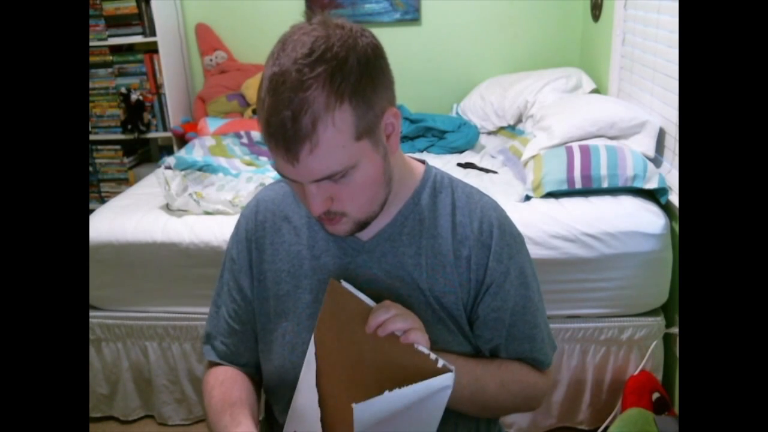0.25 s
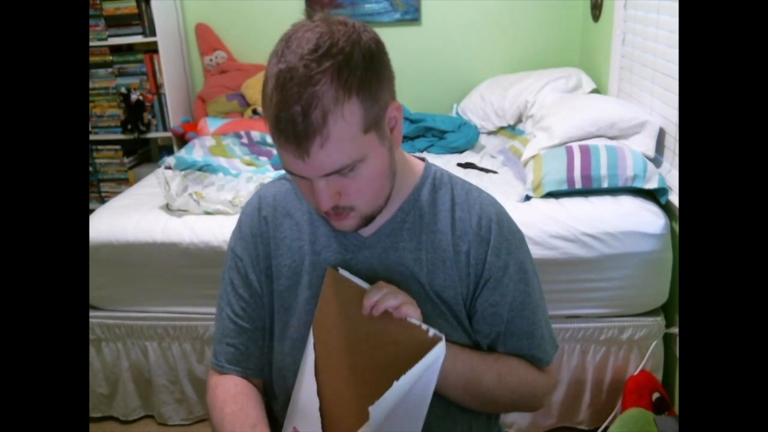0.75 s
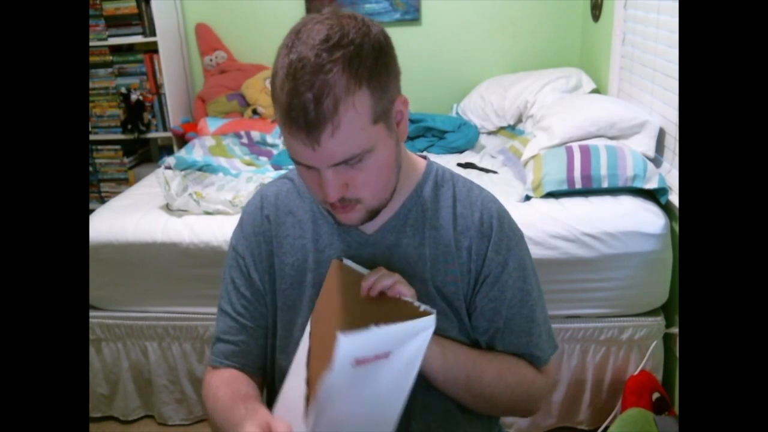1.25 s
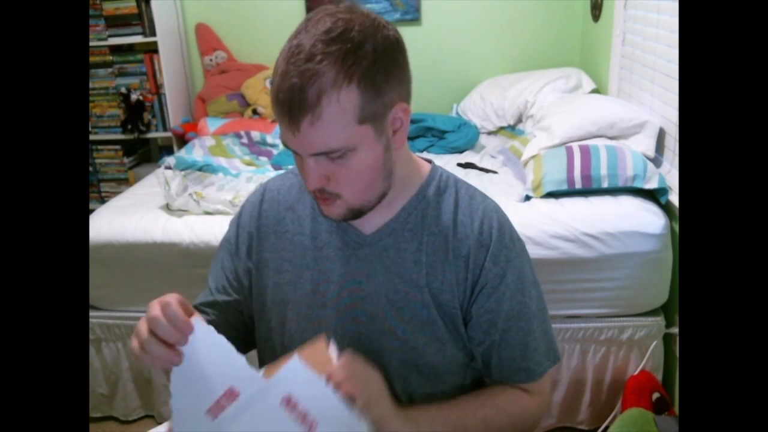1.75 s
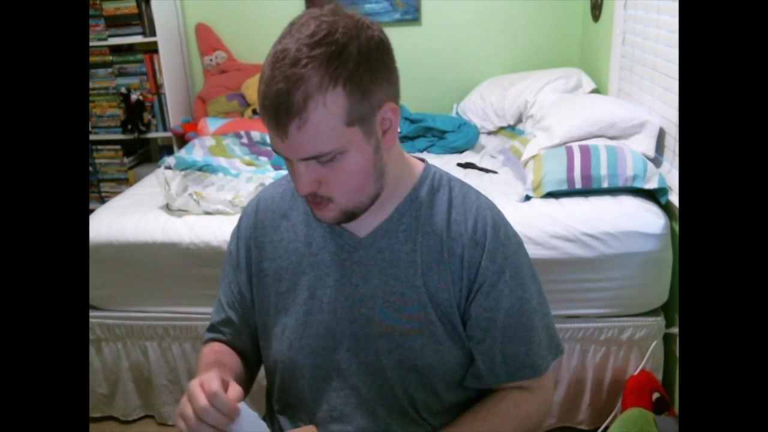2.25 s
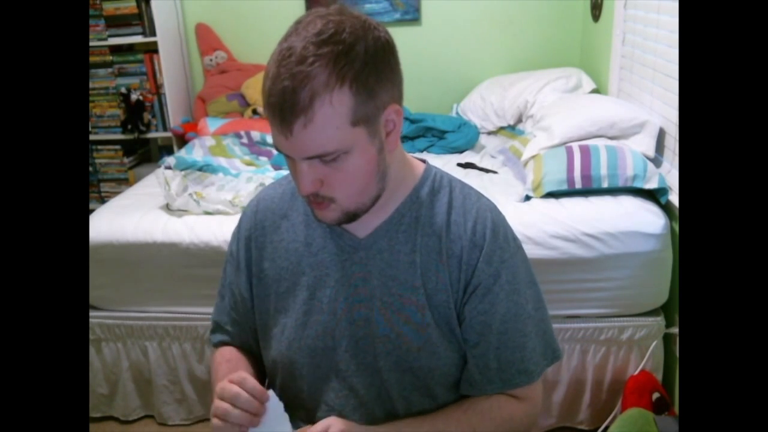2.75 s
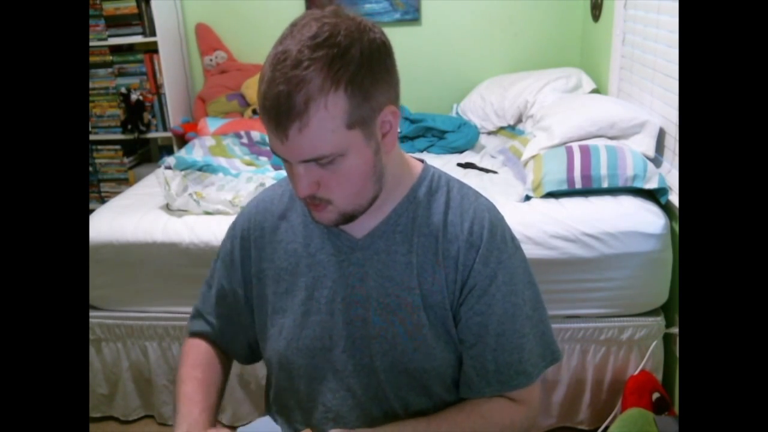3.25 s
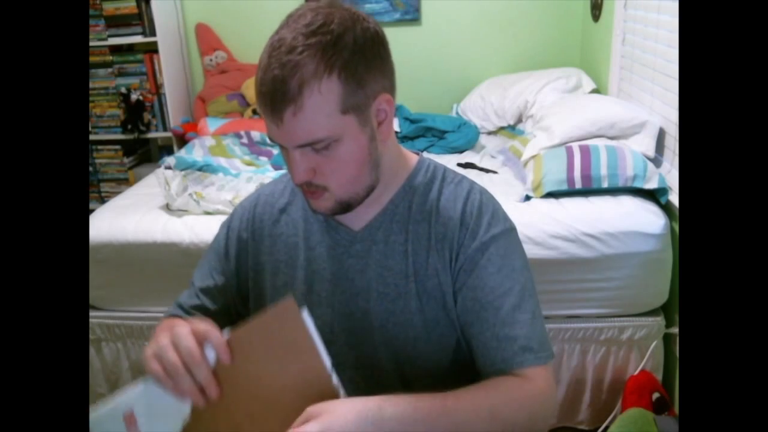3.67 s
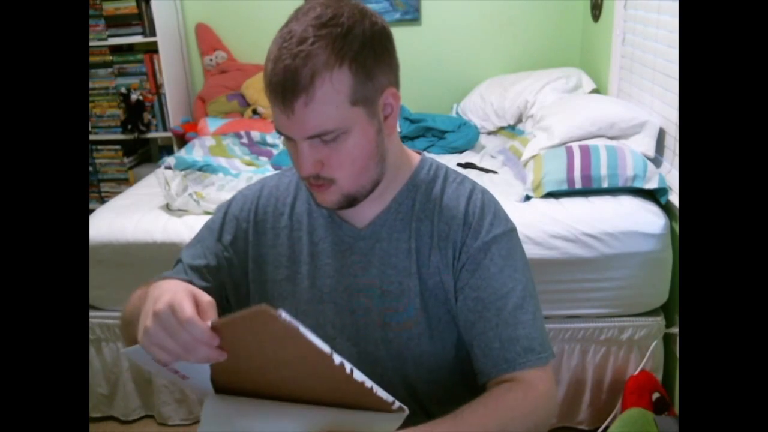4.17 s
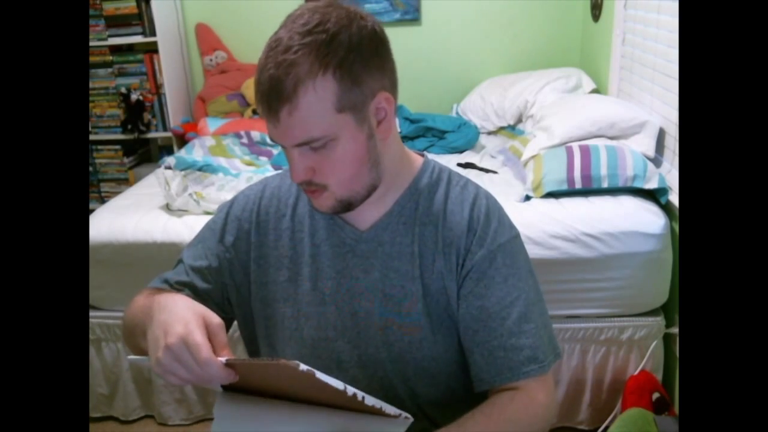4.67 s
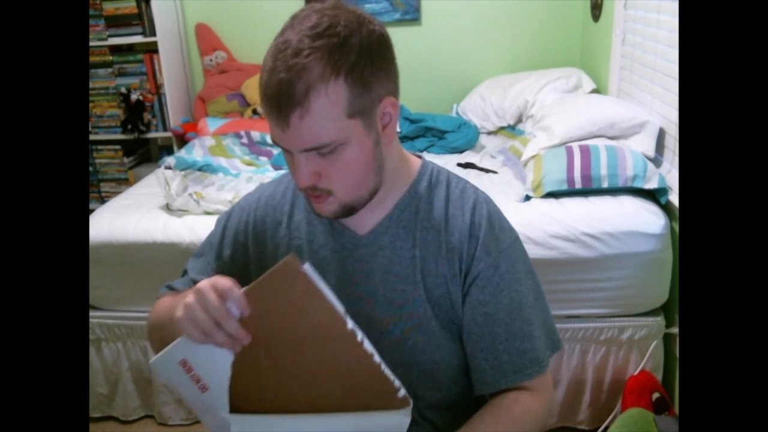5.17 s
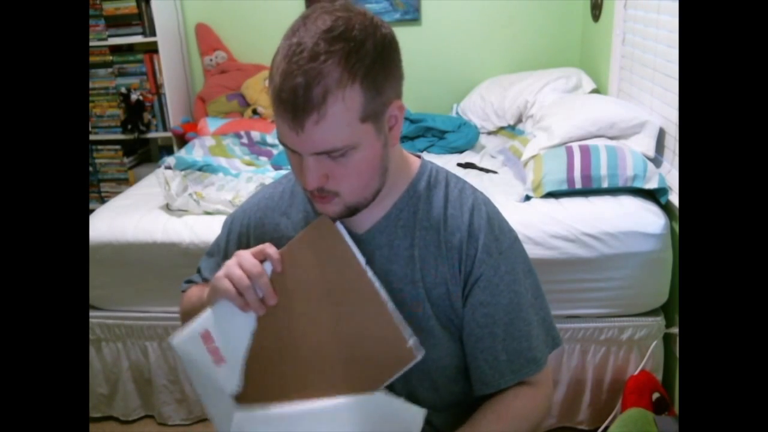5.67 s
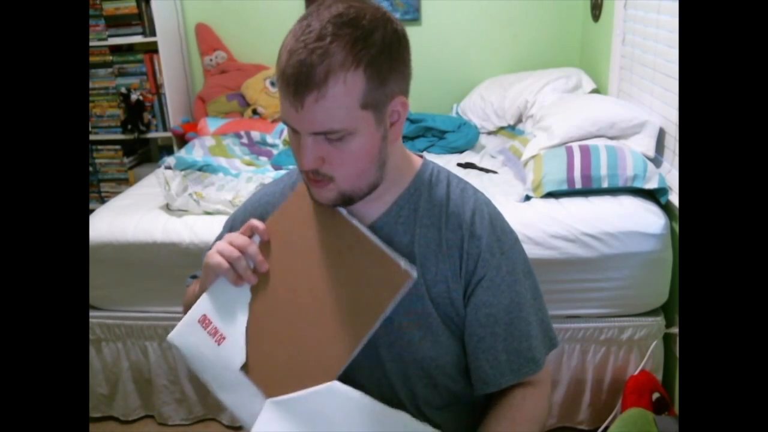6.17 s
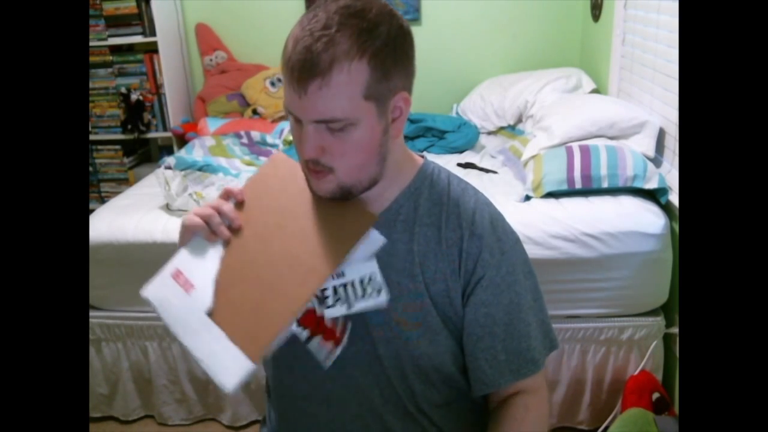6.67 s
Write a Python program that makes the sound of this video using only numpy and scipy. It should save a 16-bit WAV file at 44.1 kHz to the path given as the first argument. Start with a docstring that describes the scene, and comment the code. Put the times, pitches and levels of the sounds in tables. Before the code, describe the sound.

A small, quiet bedroom, heard close up, with a short dull echo and a steady low ventilation rumble underneath. At 0 s a stiff paper mailer is already ripping: a loud, bright, fibrous burst with dense snaps, strongest in the first 0.1 s, fading through small crackles until about 0.7 s. From 0.7 to 3.6 s there are only faint hissing brushes of hands on paper, with soft cardboard knocks around 1.4, 1.8, 2.0, 2.8 and a clearer one at 3.3 s. At about 3.7 s a brief rough swish crosses cloth with a blurred, rising then falling note. Light rustling continues; small creaks at 4.7 s, a firm knock at 5.0 s and a sharper crack at 5.1 s. From 5.3 to 6.7 s the card slips out in uneven rasping pulls, hollow and boomy, with thuds, snaps and ticks. A faint last knock and brush end it near 6.9 s.

```python
"""A paper mailer is ripped open by hand in a small, quiet bedroom: clumped fibre breaks ring the loose flap.
Thicker bundles snap, then a card insert sticks and slips out of the sleeve in several pulls.
The stiff packet knocks with a thud, crack and tick; hands brush over paper as a faint filtered hiss.
One swish over cloth adds a rough hiss and a gliding, blurred note.
Ventilation, made from steady filtered noise, rumbles low underneath."""
import sys
import numpy as np
from scipy import signal
from scipy.fft import rfft, irfft
from scipy.io import wavfile
from scipy.ndimage import uniform_filter1d

SR = 44100
rng = np.random.default_rng(int(sys.argv[2]) if len(sys.argv) > 2 else 0)


def generate_wav(signal):
    """Clip the signal to [-1, 1] and save it as 16-bit WAV at the path in sys.argv[1]."""
    frames = np.transpose(np.atleast_2d(signal))
    scaled = np.clip(frames, -1, 1) * 32767
    pcm = np.round(scaled).astype(np.int16)
    wavfile.write(sys.argv[1], SR, pcm)


N = 305613
TIME = np.arange(N) / SR

# All levels in the tables are relative: each layer sets its own final gain.
# spurts of the tear: (time [s], hold [s], release [s], level [dB],
#   panel share [dB], treble share [dB], ring pitch [Hz], ring share [dB])
RIP_SPURTS = [(0.0, .002, 0.03, -14.5, -13.5, -8, 2000, -3), (0.036, 0.031, 0.065, -27, -13, -2, 1050, 0),
              (0.091, .008, 0.19, -25.5, -14, -6, 1030, -12.5),
              (0.221, 0.011, .03, -36.5, -8, -0.5, 1850, 5),
              (0.278, 0.14, 0.083, -41, -11.5, -5.5, 1040, -17),
              (0.41, .11, .13, -37.5, -9.5, -6, 2050, -4), (0.654, .011, 0.1, -54, -21, 3, 2100, -4)]
# tone of torn paper: (frequency [Hz], density [dB per Hz])
RIP_COLOUR = [(110, -27), (210, -10), (310, -7.5), (430, -3.5), (680, -6.5), (1050, -8), (1700, -4.5),
              (2800, -8), (7000, -12), (10000, -15), (12500, -25.5), (14500, -45.5)]
# resonances of the loose flap: (frequency [Hz], width [Hz], lift [dB])
FLAP_MODES = [(300, 27, 3), (1080, 300, 1.5), (2800, 130, 2), (4190, 48, 1.5), (5230, 150, 1.8)]
# bundles of fibre and glue letting go:
#   (time [s], level [dB], crackle length [s], ring pitch [Hz], treble share [dB])
SNAPS = [(.001, -2, 0.0013, 1400, 3), (.0169, -0.5, .0014, 1200, 3.5), (0.019, -4, 0.0016, 2900, 2),
         (.0277, -24, .0006, 1300, 0), (.0588, -20.5, .0008, 6300, 12), (.068, -12, 0.00064, 3500, 3),
         (.0725, -20, 0.00079, 1760, 11), (0.0805, -15, .0006, 3700, 7), (0.092, 3, 0.001, 1070, -5.5),
         (0.124, -23.5, 0.00091, 1500, 5), (.135, -21, .0007, 7500, 0), (.293, -24.5, .0008, 2970, 8.5),
         (0.31, -29, 0.00089, 3700, 8), (.322, -24.5, 0.00083, 3450, 7), (.3715, -23, 0.0012, 2190, 8),
         (.408, -26, .00065, 3520, 10.5), (.44, -24, 0.00055, 3500, -4), (0.478, -24, .0015, 1700, 8),
         (.496, -20, 0.0016, 2130, 5), (.6548, -34, 0.00067, 2280, 10), (5.170, -23.5, .0028, 480, 4),
         (5.3375, -28, 0.00053, 1600, -7), (5.397, -22, .0009, 520, 5), (5.455, -19, 0.00058, 680, 2),
         (5.6118, -25, 0.002, 410, 10), (5.6522, -18, .0007, 413, 3), (5.7163, -12, 0.00074, 1100, 4),
         (5.7238, -15, 0.00094, 560, -2.5), (5.8262, -24, .001, 1500, 5), (5.979, -18.5, 0.0042, 2230, 5.5),
         (6.022, -23, 0.0043, 2250, 5.5), (6.045, -31, 0.0011, 2200, 4), (6.136, -27, .0008, 420, 9),
         (6.148, -29, .0006, 1625, 7), (6.169, -25, .0008, 1670, 8), (6.2633, -18, 0.0013, 1240, 6),
         (6.2747, -19.5, 0.001, 4950, 6.5), (6.281, -18, 0.0012, 2260, 6.5), (6.312, -28, 0.0013, 2480, 6),
         (6.431, -30, 0.00091, 1030, 12), (6.531, -20, 0.0012, 1020, 8.5), (6.611, -15, 0.0016, 3880, 6.5)]
# pulls on the card, which slips, is gripped again and slips on: (time [s], hold [s], release [s],
#   level [dB], panel share [dB], treble share [dB], ring pitch [Hz], ring share [dB])
TUGS = [(5.126, .023, .07, -47.5, -16, -12, 2660, 10), (5.169, 0.0064, 0.027, -43.5, -1, -1, 2600, -6),
        (5.343, 0.014, 0.064, -44, -8, -8, 1500, -6), (5.397, 0.0062, .15, -31, -5.5, -7.5, 720, -16),
        (5.449, 0.028, 0.033, -27.5, -4.5, -10, 746, 1), (5.626, 0.029, .12, -30, -1.5, -8.5, 1010, -12),
        (5.686, .07, 0.065, -26.5, -8.5, -4.5, 1100, -8), (5.767, 0.065, .14, -29.5, -3.5, -7.5, 1930, -5),
        (5.981, 0.0091, 0.05, -39, -1, 1.5, 2130, 0), (6.02, 0.021, 0.053, -36, -3.5, -4.5, 1620, 7),
        (6.09, 0.004, 0.025, -39.5, 5.5, 3, 2090, 8), (6.137, .046, 0.08, -41.5, -1, -6.5, 1630, 9),
        (6.199, .047, 0.12, -30.5, -5.5, -7.5, 1650, -23), (6.251, 0.068, 0.07, -28, -10, -10, 3100, -5),
        (6.4, 0.098, .08, -44, -1.5, -2, 980, 7.5), (6.46, 0.013, 0.1, -34, -5, -6.5, 1020, -5),
        (6.512, 0.12, 0.061, -35, -10, -8.5, 1020, -15), (6.6, 0.017, .085, -28.5, -8.5, -18, 4260, 4),
        (6.721, 0.0087, 0.026, -30.5, -12.5, -30, 2550, -9)]
# tone of card against sleeve: (frequency [Hz], density [dB per Hz])
PULL_COLOUR = [(120, -9), (210, -17.5), (310, -3.5), (400, -3), (510, -2.7), (800, -11), (1200, -11),
               (1700, -9.5), (2500, -10), (5000, -7.5), (7500, -10.5), (10500, -13.5), (12500, -22.5),
               (15000, -36)]
# resonances of the packet's panels: (frequency [Hz], width [Hz], lift [dB])
PANEL_MODES = [(522, 45, 5), (1016, 100, 3), (1670, 100, 2.5), (3550, 160, -2.5)]
# the stiff packet buckling or being knocked: (time [s], panel pitch [Hz], crease pitch [Hz],
#   thud level [dB], crack level [dB], tick level [dB], contact length [s])
KNOCKS = [(1.384, 337, 1500, -47, -47, -72, 0.0055), (1.3892, 417, 2000, -47, -45.5, -67, 0.0021),
          (1.399, 400, 1910, -55, -48, -74, 0.0023), (1.4177, 525, 2250, -55, -43.5, -61, 0.0026),
          (1.760, 403, 1400, -58, -53, -66, .005), (1.834, 480, 1930, -54, -46.5, -60, 0.0043),
          (2.024, 380, 1300, -59, -72, -80, 0.00097), (2.0305, 387, 2140, -46, -51.5, -87, .0016),
          (2.202, 398, 1480, -64, -61, -74, 0.00092), (2.795, 344, 1470, -54.5, -50, -81.5, 0.002),
          (2.878, 520, 1610, -53, -58.5, -74, .003), (2.895, 535, 1110, -53, -55, -77.5, 0.0028),
          (3.3055, 494, 2390, -41.5, -47.5, -64, 0.001), (3.315, 537, 2500, -52, -54, -66, 0.0012),
          (4.709, 500, 1564, -60, -52, -61, 0.0061), (4.758, 597, 1000, -58, -48, -60, 0.012),
          (4.872, 496, 1000, -56, -50, -67, 0.0086), (4.9954, 720, 1530, -41, -39, -82, 0.00021),
          (4.9982, 696, 1580, -30.5, -34.5, -67, 0.00058), (5.1162, 547, 1390, -31, -28, -40.5, 0.00074),
          (5.395, 550, 950, -35.5, -37.5, -36.5, 0.0038), (5.4789, 540, 800, -35, -32, -44, 0.0023),
          (5.629, 433, 1000, -32, -45, -37, 0.0032), (5.683, 494, 1100, -32, -47, -48, 0.0015),
          (5.7157, 525, 1110, -30, -40, -44, .002), (5.761, 495, 1510, -33, -31, -44, 0.0014),
          (5.824, 500, 1050, -33.5, -36, -48, 0.00062), (6.0265, 480, 1500, -36.5, -40.5, -35.5, 0.00054),
          (6.0906, 477, 1640, -35, -36.5, -56, 0.0033), (6.2008, 462, 1550, -31, -35, -59, 0.0012),
          (6.242, 425, 1000, -38, -34.5, -50, 0.00093), (6.647, 440, 1600, -39.5, -36.5, -63, 0.0036),
          (6.717, 600, 1270, -44, -35, -57, 0.0077), (6.867, 640, 1580, -45.5, -45, -67, 0.0094)]
# tone of a knock's thud: (multiple of the panel pitch [ratio], density [dB per Hz])
THUD_COLOUR = [(.24, -8.5), (.48, -7.5), (.68, 8), (1.2, 11.5), (1.65, -6), (2.8, -17.5), (5.5, -41),
               (20, -85)]
# tone of a crease cracking: (frequency [Hz], density [dB per Hz])
CRACK_COLOUR = [(350, -16), (700, 2.5), (930, 7.5), (1170, 3), (1550, 1), (1900, -1), (2400, -6.5),
                (3200, -15), (5000, -30), (12000, -85)]
# tone of an edge ticking: (frequency [Hz], density [dB per Hz])
TICK_COLOUR = [(1500, -24), (3000, 5), (6500, 6.5), (10000, -3.5), (13000, -14), (15500, -27)]
# light slides of hands and card over paper: (time [s], hold [s], level [dB], fine hiss share [dB])
BRUSHES = [(0.737, 0.28, -60.5, -8.5), (1.068, 0.031, -56, -7), (1.199, 0.061, -70.5, 1.5),
           (1.416, .02, -59, -24), (1.486, 0.22, -62.5, -5.5), (1.757, .02, -57.5, -5.5),
           (1.82, 0.17, -74, -3), (2.088, 0.036, -64.5, -6.5), (2.25, 0.026, -61, -13.5),
           (2.442, 0.0088, -60, -13), (2.649, 0.046, -57, -9.5), (2.798, .11, -68, -7),
           (3.302, 0.026, -63, -7), (3.432, 0.2, -65, -6.5), (3.695, 0.1, -57, -20),
           (3.822, 0.069, -64.5, -8.5), (4.004, .03, -73.5, -4.5), (4.71, 0.081, -60, -15),
           (4.881, 0.024, -58.5, -14), (5.022, 0.027, -63, -13), (5.237, 0.087, -61, -9.5),
           (6.79, 0.15, -57, -6.5)]
# tone of a light slide: (frequency [Hz], density [dB per Hz])
BRUSH_COLOUR = [(200, -3), (400, 3), (1000, -1), (1800, -1), (3500, -4), (5200, -4), (7500, -5.5),
                (10500, -7.5), (12500, -13.5), (14500, -37)]
# tone of the packet scraping over cloth: (frequency [Hz], density [dB per Hz])
SWISH_COLOUR = [(1500, -26), (2800, -6), (3500, -8), (5100, 1.5), (6300, -6.5), (9500, -7), (12000, -15),
                (14000, -43)]
# glide of the note from the weave: (time [s], pitch [Hz])
SWISH_PITCH = [(3.655, 2800), (3.70, 4300), (3.745, 4840), (3.81, 3880)]
# tone of ventilation and still air: (frequency [Hz], density [dB per Hz])
AIR_COLOUR = [(12, 1), (22, 6), (36, -4), (52, 0.5), (78, -5), (115, -15), (165, -27), (210, -30.5),
              (330, -29), (570, -30.5), (950, -39.5), (2300, -48), (5000, -56), (6500, -61), (15500, -68)]

# an attack is the time a stroke takes to swell by its last 20 dB
RIP_ATTACK_S, TUG_ATTACK_S = 0.0043, 0.028
BRUSH_ATTACK_S, BRUSH_RELEASE_S = 0.085, 0.083
SNAP_WIDTH_HZ, SNAP_LIFT_DB = 250, 13.5   # each snap rings its own patch of paper
RING_WIDTH_HZ = 200   # of the stretch of paper that a stroke pulls taut
KNOCK_SPAN_S = 0.012   # each part of a dry knock has its level as rms over this time
CREASE_WIDTH_HZ, CREASE_LIFT_DB = 380, 6
SETTLE_S, SETTLE_DB = 0.026, -11   # after a knock the sheets touch again a few times
CATCHES_PER_S, CATCH_DB, CATCH_SPREAD_DB = 22, -22, 6   # stray fibres catch while the paper slides
SWISH_AT_S, SWISH_HOLD_S, SWISH_ATTACK_S, SWISH_RELEASE_S = 3.69, 0.067, 0.075, 0.1
SWISH_DB = -53.5
WEAVE_DB, WEAVE_WIDTH_HZ = -6.5, 1600   # level relative to the swish
AIR_DB = -39
ROOM_FADE_S, ROOM_DULL_HZ = 0.28, 9040   # 60 dB fall before the tail is tapered; treble edge
ROOM_DB, KNOCK_ROOM_DB = -3.5, -4.5   # echo relative to direct sound, before dulling
CUTOFF_HZ = 15800


def rip():
    """Fibres break in clumps as the tear runs and set the loose flap ringing."""
    gain, panel_db, treble_db, *_ = strokes(RIP_SPURTS, RIP_ATTACK_S)
    jerk = jerks(per_s=300, decay_s=.0006, depth_db=2.5, spread_db=2.5)
    breaks = grains(per_s=2200, spread_db=1.5, ring_s=0.00054, smooth_db=-5.5, patchy_db=1.0, jerk=jerk)
    drive = breaks * gain + taut(breaks, RIP_SPURTS, RIP_ATTACK_S)
    flap = through(drive, response(RIP_COLOUR, FLAP_MODES))
    return from_db(-4.0) * shade(flap, panel_db + 11.0, treble_db + 4)


def snaps():
    """Thicker bundles part with a bright crack and a brief ring."""
    out = np.zeros(N)
    for s, level_db, crackle_s, ring_hz, treble_db in SNAPS:
        patch = response(RIP_COLOUR, [(ring_hz, SNAP_WIDTH_HZ, SNAP_LIFT_DB)])
        crack = from_db(level_db + 4.5) * through(blow(crackle_s), patch)
        body = signal.lfilter(*signal.butter(1, 2700, fs=SR), crack)
        add(out, s, body + (crack - body) * from_db(treble_db))
    return shade(out, panel_db=-7.5, treble_db=3.0)


def pull():
    """Card sticks and slips against the sleeve, whose panels boom under the rasp."""
    gain, panel_db, treble_db, *_ = strokes(TUGS, TUG_ATTACK_S)
    jerk = jerks(per_s=170, decay_s=0.00087, depth_db=2.0, spread_db=2.5)
    slips = grains(per_s=4500, spread_db=3.0, ring_s=0.00076, smooth_db=-4.0, patchy_db=2.5, jerk=jerk)
    drive = slips * gain + taut(slips, TUGS, TUG_ATTACK_S)
    rasp = through(drive, response(PULL_COLOUR, PANEL_MODES))
    return from_db(-1.58) * shade(rasp, panel_db + 5.5, treble_db + 1.5)


def knocks():
    """Each knock thuds in the panel, cracks in a crease and ticks at the edge."""
    out, tick = np.zeros(N), response(TICK_COLOUR)
    for s, pitch_hz, crease_hz, thud_db, crack_db, tick_db, contact_s in KNOCKS:
        # the panel gives as a whole; its free span sets the pitch
        thud = response(np.array(THUD_COLOUR) * [pitch_hz, 1], [(pitch_hz, 260, 5)])
        add(out, s, from_db(thud_db) * thud)
        crumple = through(blow(contact_s), settle())
        crack = response(CRACK_COLOUR, [(crease_hz, CREASE_WIDTH_HZ, CREASE_LIFT_DB)])
        for level_db, ring in ((crack_db, crack), (tick_db, tick)):
            sound = through(crumple, ring)
            add(out, s, from_db(level_db) * sound / np.linalg.norm(sound))
    return out * np.sqrt(KNOCK_SPAN_S * SR)


def brush():
    """Light sliding contact: a fine, faint hiss with sparse catching fibres."""
    rows = [(s, hold_s, BRUSH_RELEASE_S, db, fine) for s, hold_s, db, fine in BRUSHES]
    touch, fine_db = strokes(rows, BRUSH_ATTACK_S)
    uneven_hiss = rms_one(rng.standard_normal(N) * from_db(1.9 * drift(260)))
    rubbing = uneven_hiss + from_db(CATCH_DB) * catches()
    hiss = through(rubbing * touch, response(BRUSH_COLOUR))
    coarse = lows(hiss, 4800)
    return from_db(0.5) * (coarse + (hiss - coarse) * from_db(fine_db + 6.5))


def swish():
    """The packet scrapes over cloth: a rough hiss, and threads ticking past as a blurred gliding note."""
    lift = from_db(SWISH_DB) * stroke(SWISH_AT_S, SWISH_HOLD_S, SWISH_ATTACK_S, SWISH_RELEASE_S)
    roughness = jerks(per_s=240, decay_s=.002, depth_db=-1, spread_db=1.5)
    scrape = through(rng.standard_normal(N) * roughness, response(SWISH_COLOUR))
    pitch_hz = np.interp(TIME, *np.transpose(SWISH_PITCH))
    phase = 2 * np.pi * np.cumsum(pitch_hz) / SR
    # low noise times a tone blurs the note into a band
    threads = rms_one(lows(rng.standard_normal(N), WEAVE_WIDTH_HZ / 2) * np.cos(phase))
    drag = from_db(SWISH_DB + WEAVE_DB) * stroke(3.662, hold_s=.105, attack_s=0.022, release_s=0.06)
    return lift * scrape + drag * threads


def air():
    """Steady low rumble of ventilation with a faint duct tone."""
    ring = response(AIR_COLOUR, [(556, 30, 3.0)])
    noise = rng.standard_normal(N + len(ring) - 1)
    return from_db(AIR_DB) * rms_one(signal.fftconvolve(noise, ring, "valid"))


def bedroom(x, wet_db, count=3, size=20000):
    """Direct sound, then a short dull tail whose echo pattern shifts as the packet moves."""
    t = TIME[:size]
    fade = from_db(-60 * t / ROOM_FADE_S) * np.clip((t - .0015) / 0.0011, 0, 1)
    places = np.array([drift(7) for _ in range(count)])
    places /= np.linalg.norm(places, axis=0)
    echoes = sum(through(x * place, diffuse(fade)) for place in places)
    echoes = signal.lfilter(*signal.butter(1, ROOM_DULL_HZ, fs=SR), echoes)
    wet = from_db(wet_db)
    return (x + wet * echoes) / np.sqrt(1 + wet ** 2)


def diffuse(fade, size=61):
    """Scattered echoes that favour no broad band of pitch; unit energy."""
    echoes = rng.standard_normal(len(fade)) * fade
    spectrum = rfft(echoes)
    band_power = uniform_filter1d(np.abs(spectrum) ** 2, size=size)
    echoes = irfft(spectrum / np.sqrt(band_power), len(fade))
    echoes *= (fade > 0) * np.linspace(1, 0, len(fade)) ** 2   # taper to silence
    return echoes / np.linalg.norm(echoes)


def grains(per_s, spread_db, ring_s, smooth_db, patchy_db, jerk):
    """Ringing slips over a rubbing hiss, driven in jerks, with a wandering colour; rms 1."""
    hiss = rng.standard_normal(N)
    bass = lows(hiss, 740)   # the large panels average over many slips
    slips = rms_one(pings(per_s, spread_db, ring_s) + from_db(smooth_db) * (hiss - bass))
    crackle = 0
    for edge_hz in 1200 * 1.3 ** np.arange(11):
        band = lows(slips, edge_hz)
        slips = slips - band
        # each spot of paper favours other bands
        crackle = crackle + band * rms_one(from_db(patchy_db * drift(35)))
    return rms_one(even(bass) + even(crackle * jerk))


def pings(per_s, spread_db, ring_s, size=160):
    """Each tiny slip rings a facet of paper for a moment, at a pitch of its own; rms 1."""
    when, pitch, strength, phase = rng.random((int(per_s * N / SR), 4)).T[:, :, None]
    hz = 700 + 13000 * pitch
    height = from_db(spread_db * np.minimum(-np.log1p(-strength), 3))
    t = TIME[:size]
    rings = height * np.sin(2 * np.pi * (hz * t + phase)) * np.exp(-t / ring_s)
    at = (when * N).astype(int) + np.arange(size)
    return rms_one(np.bincount(at.ravel(), rings.ravel(), minlength=N)[:N])


def jerks(per_s, decay_s, depth_db, spread_db):
    """Stick and slip: a gain that jumps each time the paper lets go, mostly a little, then sinks; rms 1."""
    lets_go = rng.random(N) < per_s / SR
    jump_db = depth_db + spread_db * np.minimum(rng.exponential(1, N), 3)
    releases = lets_go * from_db(jump_db) ** 2
    surge = signal.lfilter([1], [1, -np.exp(-1 / (decay_s * SR))], releases)
    return rms_one(np.sqrt(1 + surge))


def taut(x, rows, attack_s):
    """Each stroke pulls another stretch of paper taut, which rings at its own pitch."""
    out, r = np.zeros(N), np.exp(-np.pi * RING_WIDTH_HZ / SR)
    for s, hold_s, release_s, db, _, _, ring_hz, ring_db in rows:
        drive = x * from_db(db + ring_db) * stroke(s, hold_s, attack_s, release_s)
        resonator = [1, -2 * r * np.cos(2 * np.pi * ring_hz / SR), r * r]
        out += signal.lfilter([1 - r, 0, r - 1], resonator, drive)
    return out


def blow(contact_s, size=4096):
    """A short contact is one sharp give; a long one crumples in a swelling flurry. Unit energy."""
    age = TIME[:size] / contact_s
    flurry = rng.standard_normal(size) * np.sqrt(age) * np.exp(-age)
    push = (contact_s / 0.00069) * flurry / np.linalg.norm(flurry)
    push[0] += 1
    return push / np.linalg.norm(push)


def settle(count=4, size=2048):
    """A first contact, then a few weaker ones at uneven times."""
    touches = np.zeros(size)
    touches[0] = 1
    for when, strength in rng.random((count, 2)):
        at = min(int((.1 + when) * SETTLE_S * SR), size - 1)
        touches[at] += from_db(SETTLE_DB) * strength * (1.5 - when)
    return touches


def catches():
    """Sparse clicks of uneven size, as stray fibres catch; rms 1."""
    strength_db = CATCH_SPREAD_DB * np.minimum(rng.exponential(1, N), 3)
    return rms_one((rng.random(N) < CATCHES_PER_S / SR) * from_db(strength_db))


def stroke(s, hold_s, attack_s, release_s):
    """Gain of one hand movement: swells up to time s, holds, dies away; 20 dB per attack or release time."""
    early = np.maximum(s - TIME, 0) / attack_s
    late = np.maximum(TIME - s - hold_s, 0) / release_s
    return np.exp(-np.log(10) * np.minimum(early + late, 6))   # floor at -120 dB


def strokes(rows, attack_s):
    """Joint gain of rows (s, hold, release, level, tones..), then each tone, weighted by stroke power."""
    gains = [from_db(db) * stroke(s, hold_s, attack_s, release_s) for s, hold_s, release_s, db, *_ in rows]
    power = np.array(gains) ** 2
    total = power.sum(axis=0)
    tones = np.transpose([row[4:] for row in rows])
    return [np.sqrt(total), *tones @ power / total]


def shade(x, panel_db, treble_db):
    """The grip changes how much the panels boom and how bright the edge sounds."""
    boom, body = lows(x, 746), lows(x, 2700)
    return boom * from_db(panel_db) + body - boom + (x - body) * from_db(treble_db)


def even(x, size=1300):
    """The hand pulls steadily: only flutter faster than about 30 ms is left."""
    return x * np.std(x) / np.sqrt(uniform_filter1d(x ** 2, size=size) + 1e-12)


def response(colour, modes=(), size=8192):
    """Causal unit-energy ring of a body with this spectrum and these resonances."""
    hz = np.maximum(np.arange(size // 2 + 1) * SR / size, 1)
    points = np.array(colour)
    db = np.interp(np.log(hz), np.log(points[:, 0]), points[:, 1])
    db = db + 40 * np.log10(np.minimum(hz / points[0, 0], 1))   # 12 dB per octave below the first point
    for centre, width, lift_db in modes:
        db = db + lift_db / (1 + (2 * (hz - centre) / width) ** 2)
    # fold the cepstrum: minimum phase, so the ring starts at once
    cepstrum = irfft(np.log(from_db(db)))
    cepstrum[1:size // 2] *= 2
    cepstrum[size // 2 + 1:] = 0
    ring = irfft(np.exp(rfft(cepstrum)))
    return ring / np.linalg.norm(ring)


def through(x, ring):
    """Drive a body or a room with x."""
    return signal.oaconvolve(x, ring)[:N]


def lows(x, edge_hz):
    """The part of x below an edge, without delay."""
    return signal.sosfiltfilt(signal.butter(2, edge_hz, fs=SR, output="sos"), x)


def drift(per_s):
    """Smooth chance with rms 1, moving to a new random value per_s times a second."""
    knots = rng.standard_normal(N // 20)
    return rms_one(np.interp(TIME * per_s, np.arange(len(knots)), knots))


def from_db(db):
    """Decibels to gain."""
    return 10 ** (np.asarray(db) / 20)


def rms_one(x):
    """Scale to unit rms."""
    return x / np.sqrt(np.mean(x ** 2) + 1e-20)


def add(track, s, sound):
    """Lay a sound into a track at time s."""
    start = round(s * SR)
    track[start:start + len(sound)] += sound[:N - start]


def scene():
    """All the paper sounds in the room, over the rumble."""
    paper = bedroom(rip() + snaps() + pull() + brush() + swish(), ROOM_DB)
    packet = bedroom(knocks(), KNOCK_ROOM_DB)
    return (paper + packet + air())[None]


def record(dry):
    """The top is cut steeply."""
    return signal.sosfilt(signal.ellip(10, .2, 80, CUTOFF_HZ, fs=SR, output="sos"), dry)


dry = scene()
out = record(dry)
generate_wav(out)
```